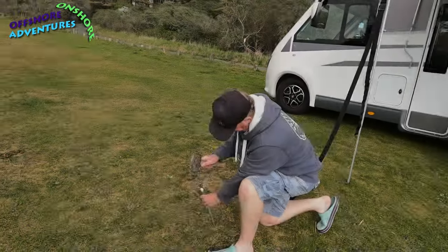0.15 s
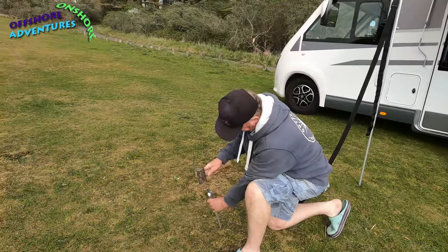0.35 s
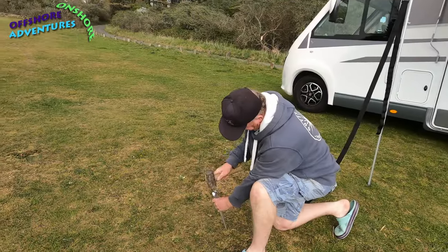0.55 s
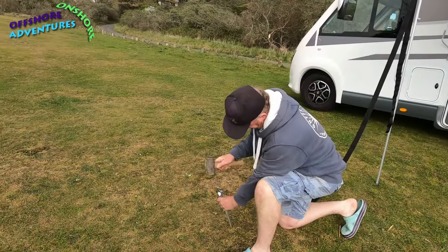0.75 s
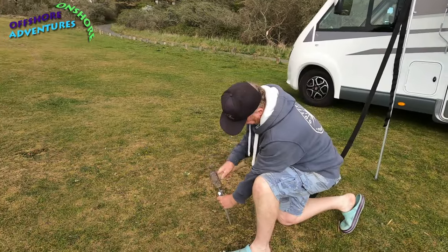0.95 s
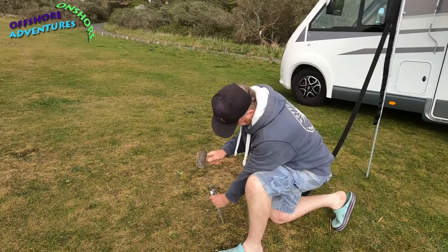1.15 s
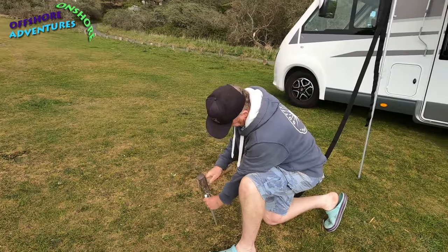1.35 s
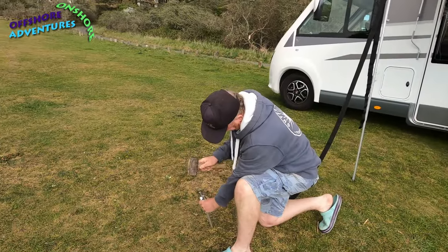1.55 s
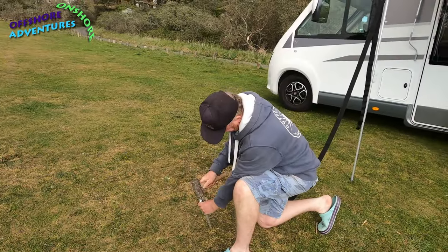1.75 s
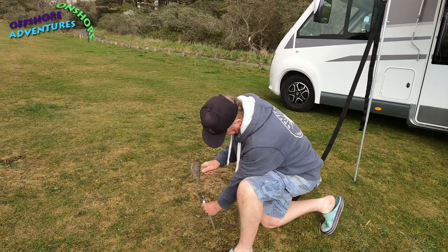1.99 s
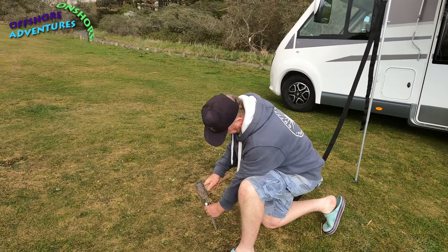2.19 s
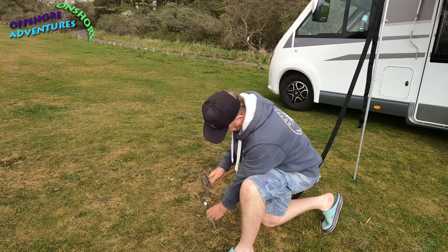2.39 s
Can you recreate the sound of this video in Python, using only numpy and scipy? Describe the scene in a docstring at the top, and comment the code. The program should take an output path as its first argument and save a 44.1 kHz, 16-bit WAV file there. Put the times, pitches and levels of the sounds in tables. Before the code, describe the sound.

Seven bright hammer blows land on a metal peg at a steady pace, a few metres off on an open lawn. Each rings faintly and echoes briefly, and the later ones thud more as a faint low rumble eases.

```python
"""A club hammer drives a steel tent peg into a lawn, a few metres off: seven blows, about 0.4 s apart.
Each blow chatters on the peg, rebounds within 5 ms and thuds the turf. A parked camper van, then a
hedge, throw the clank back; the steel rings on faintly. Grit crunches at the peg after some blows.
The thud grows as the peg goes deeper, while a low outdoor rumble eases off under a faint hiss."""
import sys
import numpy as np
from scipy import signal
from scipy.fft import rfft, irfft
from scipy.io import wavfile
from scipy.ndimage import uniform_filter1d

SR = 44100
rng = np.random.default_rng(int(sys.argv[2]) if len(sys.argv) > 2 else 0)


def master_out(mix):
    """Clip the mix to full scale and print it as 16-bit PCM to the path in sys.argv[1]."""
    frames = np.transpose(np.atleast_2d(mix))
    ceiling = np.clip(frames, -1, 1)
    pcm = np.round(ceiling * 32767).astype(np.int16)
    wavfile.write(sys.argv[1], SR, pcm)


N = 106986

# Hammer blows. Each row: start in seconds, clank gain in dB, rebound delay in seconds, rebound, body,
# bite and treble gains in dB, main mode in Hz, then main mode, thud, echo and head ring gains in dB.
BLOWS = [(.0062, -2, 0.0039, -2, -0.5, 2.5, -1.5, 3242, -5.5, -19, 0, -29),
         (0.3602, 2, 0.0036, -3.5, -5.5, 2.5, -2.5, 3356, -2.5, -10.5, -3, -28),
         (0.698, 1.5, .0042, -6, -0.5, -2.5, 1, 3186, -3, -3.5, -.5, -7.5),
         (1.0686, -1.5, .0022, -1, -2, 2.5, 0.5, 3348, 4, -1.5, -4.5, -9),
         (1.4634, -.5, 0.0028, -4.5, 2, 0.5, 1.5, 3400, -1.5, 1.5, -3, -3.5),
         (1.8731, -1, .0028, -3, 3, 2, 4.5, 3420, 1.5, 0, -3, -24),
         (2.2976, -1.5, 0.0022, -1, 1.5, 1.5, 0.5, 3040, 1, 3, -1, -0.5)]
# Peg modes, damped by hand and soil. Each row: frequency in Hz, relative level in dB, T60 in seconds.
PEG_MODES = [(1111, -18, 0.0047), (2577, -17, 0.042), (3175, -9, 0.036), (3549, -8, 0.03), (4220, -5, 0.02),
             (5305, -9.5, 0.021), (7125, -9, 0.021), (8536, -17, 0.031), (9565, -22, 0.03),
             (10933, -14.5, 0.024), (13140, -28.5, 0.029)]
# Lasting steel modes. Each row: frequency in Hz, relative level in dB, T60 in seconds.
STEEL_MODES = [(3260, -8, 0.41), (3610, -2.5, .3), (4090, -7, .26), (5320, -7.5, .3), (7240, -13.5, .28),
               (8377, -14, .25), (8560, -13, 0.45)]
# Turf modes. Each row: delay in seconds, frequency in Hz, relative level in dB, T60 in seconds.
TURF_MODES = [(0.003, 47, -39, 0.38), (0.0023, 207, -28, .07), (.0015, 350, -30, 0.043),
              (0.0024, 540, -38.5, 0.048), (.013, 135, -24, 0.023)]
# Grit crunches. Each row: start, rise and decay in seconds, level in dB, band centre in Hz.
CRUNCHES = [(.049, 0.0016, 0.0049, -51.5, 390), (.958, .0015, 0.0056, -44.5, 910),
            (.735, .003, 0.0041, -45.5, 910), (2.332, 0.021, 0.013, -38.5, 640)]
# Noise spectra. Each row: frequency in Hz, relative density in dB.
CHATTER_SPECTRUM = [(200, -15.5), (500, -13.5), (750, -26), (1050, -7.5), (1800, -7), (3200, -1),
                    (4300, -1.5), (5500, -5), (7300, -9), (9500, -12), (12000, -22.5), (14000, -26),
                    (16000, -51)]
SOIL_SPECTRUM = [(30, -9), (100, -3.5), (170, 2), (330, -12.5), (600, -22.5), (1500, -35)]
RUMBLE_SPECTRUM = [(12, -33), (25, -18.5), (36, -4), (47, 7), (60, -4), (80, -10.5), (114, -16.5),
                   (150, -12), (216, -11.5), (280, -20), (380, -31), (544, -37.5), (700, -45), (910, -59.5)]
HISS_SPECTRUM = [(300, -6), (700, -3), (1200, 0), (2000, -8), (3500, -10), (7000, -18), (10000, -28),
                 (16000, -44)]
# Reflector responses. Each row: frequency in Hz, gain in dB.
VAN_RESPONSE = [(150, -18.5), (700, -16), (2000, -3.5), (3300, -11), (4200, -12.5), (5400, -13),
                (7000, -17), (10000, -14.5), (15000, -33.5)]
HEDGE_RESPONSE = [(150, -17), (700, -16.5), (1300, -17.5), (2200, -12.5), (3300, -21.5), (4200, -20.5),
                  (5400, -20), (7000, -23), (10000, -20), (12500, -21), (15000, -37.5)]
# Hedge scatter decay. Each row: frequency in Hz, T60 in seconds.
HEDGE_DECAY = [(200, 0.21), (1000, .36), (3000, 0.41), (7000, 0.4), (13000, 0.14)]
# Rumble envelope. Each row: time in seconds, level in dB.
RUMBLE_ENVELOPE = [(0, -49.5), (.85, -52), (1.3, -55), (1.701, -56.5), (2.42, -58)]
# Microphone port phase. Each row: frequency in Hz, lag of the left port in radians.
PORT_LAG = [(20, 1), (400, 0.36), (1400, 0.1), (3300, 0.75), (5200, 1.38), (7000, 1.35), (9000, 1.2),
            (12000, 1.95)]
# Microphone port balance. Each row: frequency in Hz, left minus right in dB.
PORT_BALANCE = [(100, 3), (1200, -2.5), (3300, 2), (5500, -2), (7000, -2.5), (9000, -9), (14000, 1.5)]

STEEL_RISE_S, TURF_RISE_S = 0.00052, 0.0025


def peg_clank(rebound_s, rebound_db, body_db, bite_db, treble_db, main_hz, main_db):
    """The hammer lands, rebounds and lands again; each contact chatters and rings the peg."""
    modes_db, chatter_db, chatter_s, detune = -14, -14.5, 0.003, 0.0061
    t = np.arange(SR // 6) / SR
    out = np.zeros(len(t))
    chatter_envelope = np.minimum(t / STEEL_RISE_S, 1) * np.exp(-(t / chatter_s) ** 2)
    for start_s, contact_db in [(0, 0), (rebound_s, rebound_db)]:
        modes = np.zeros(len(t))
        for hz, db, t60_s in PEG_MODES:
            detuned_hz = hz * (1 + detune * rng.standard_normal())
            modes += ring(t, detuned_hz, db, t60_s) * rng.choice([-1, 1])
        chatter = noise(CHATTER_SPECTRUM, len(t)) * chatter_envelope
        add(out, start_s, amp(contact_db) * (amp(modes_db) * modes + amp(chatter_db) * chatter))
    out += ring(t, main_hz, main_db - 15.5, t60_s=0.038)
    return colour(out, [(1700, body_db), (3200, 0), (4200, bite_db), (5500, treble_db)])


def steel_ring(head_db):
    """Thin, wavering after-ring of the peg, plus one high mode of the hammer head."""
    modes_db, detune, waver_depth, waver_s = -50.5, 0.0021, 0.99, 0.02
    t = np.arange(SR // 2) / SR
    modes = [ring(t, hz * (1 + detune * rng.standard_normal()), modes_db + db, t60_s)
             for hz, db, t60_s in STEEL_MODES]
    waver = unit(uniform_filter1d(rng.standard_normal((len(modes), len(t))), round(waver_s * SR)))
    head = ring(t, hz=12110, db=head_db - 57.5, t60_s=0.55)
    return (modes * (1 + waver_depth * waver)).sum(0) + head


def turf_thud():
    """The peg shoves the turf, which bounces and settles."""
    soil_db, soil_decay_s = -35, 0.036
    t = np.arange(SR // 3) / SR
    modes = sum(ring(t - delay_s, hz, db, t60_s, TURF_RISE_S) for delay_s, hz, db, t60_s in TURF_MODES)
    soil_envelope = np.minimum(t / TURF_RISE_S, 1) * np.exp(-t / soil_decay_s)
    return modes + amp(soil_db) * noise(SOIL_SPECTRUM, len(t)) * soil_envelope


def grit_crunch(grain_db=6.5):
    """Grit and grass rub where the peg shifts: bursts of grainy band noise."""
    t, out = np.arange(N) / SR, np.zeros(N)
    for start_s, rise_s, decay_s, db, centre_hz in CRUNCHES:
        white = rng.standard_normal(N)
        grains = white * amp(grain_db * unit(uniform_filter1d(rng.standard_normal(N), size=60)))
        offset_octaves = np.log2((np.fft.rfftfreq(N, 1 / SR) + 1) / centre_hz)
        friction = unit(irfft(rfft(grains) * np.exp(-offset_octaves ** 2 / 2), N))
        attack = np.clip((t - start_s) / rise_s, 0, 1)
        decay = np.exp(-np.maximum(t - start_s - rise_s, 0) / decay_s)
        out += amp(db) * attack * decay * friction
    return out


def grass_scatter(x, gain_db=-13.5, peak_s=0.0016):
    """Quick reflections off the lawn, different in each channel."""
    t = np.arange(SR // 40) / SR
    taps = rng.standard_normal((2, len(t))) * t * np.exp(-2 * t / peak_s)
    return amp(gain_db) * signal.fftconvolve(x[None], taps / np.linalg.norm(taps[0]), axes=1)[:, :N]


def van_echo(x, spread_s=0.0097):
    """Short cluster of reflections off the side of the van."""
    t = np.arange(SR // 20) / SR
    taps = rng.standard_normal(len(t)) * np.exp(-(t / spread_s) ** 2)
    return colour(signal.fftconvolve(x, taps / np.linalg.norm(taps)), VAN_RESPONSE)


def hedge_echo(x):
    """Diffuse scatter off the bushes; it thins beyond the hedge, and the top treble dies first."""
    hedge_end_s, drop_db, left_bias_db = 0.105, -5, 1
    white = pair(*rng.standard_normal((2, SR * 2 // 3)), correlation=0.26)
    hz, t, spectrum = signal.stft(white, SR, nperseg=256)
    decay_db = drop_db * (t > hedge_end_s) - 60 * t / read(HEDGE_DECAY, hz)[:, None]
    tail = signal.istft(spectrum * amp(decay_db), SR, nperseg=256)[1]
    echo = signal.fftconvolve(x[None], tail / np.linalg.norm(tail[0]), axes=1)
    return colour(echo, HEDGE_RESPONSE) * amp([[left_bias_db / 2], [-left_bias_db / 2]])


def outdoor_air(hiss_db=-73):
    """Low rumble that eases off, and a faint far hiss."""
    rumble_db = np.interp(np.arange(N) / SR, *np.transpose(RUMBLE_ENVELOPE))
    rumble = pair(noise(RUMBLE_SPECTRUM), noise(RUMBLE_SPECTRUM), correlation=0.84)
    hiss = pair(noise(HISS_SPECTRUM), noise(HISS_SPECTRUM), correlation=0.43)
    return amp(rumble_db) * rumble + amp(hiss_db) * hiss


def microphone_ports(x):
    """Near sound reaches the right port first; the balance varies with frequency."""
    hz = np.fft.rfftfreq(2 * N, 1 / SR)
    spectrum, balance = rfft(x, 2 * N), amp(read(PORT_BALANCE, hz) / 2)
    left = spectrum * balance * np.exp(-1j * read(PORT_LAG, hz))
    return irfft(np.array([left, spectrum / balance]))[:, :N]


def ring(t, hz, db, t60_s, rise_s=STEEL_RISE_S):
    """One decaying mode, silent before t = 0."""
    t = np.maximum(t, 0)
    return amp(db - 60 * t / t60_s) * np.minimum(t / rise_s, 1) * np.sin(2 * np.pi * hz * t)


def noise(points, size=N):
    """Noise of rms 1 with a (Hz, dB) spectrum."""
    gain = amp(read(points, np.fft.rfftfreq(size, 1 / SR)))
    return unit(irfft(rfft(rng.standard_normal(size)) * gain, size))


def colour(x, points, size=2048):
    """Causal filter with a (Hz, dB) response."""
    log_gain = np.log(amp(read(points, abs(np.fft.fftfreq(size, 1 / SR)))))
    taps = np.fft.ifft(np.exp(signal.hilbert(log_gain).conj())).real[:size // 2]
    return signal.fftconvolve(x, np.array(taps, ndmin=x.ndim), axes=-1)[..., :x.shape[-1]]


def pair(a, b, correlation):
    """Stereo from two independent signals."""
    return np.array([a, correlation * a + np.sqrt(1 - correlation ** 2) * b])


def read(points, hz):
    """Table lookup on a log-frequency axis."""
    points_hz, values = np.transpose(points)
    return np.interp(np.log(hz + 1), np.log(points_hz + 1), values)


def add(mix, start_s, sound):
    """Mixes a sound in place."""
    part = mix[..., round(start_s * SR):][..., :sound.shape[-1]]
    part += sound[..., :part.shape[-1]]


def amp(db):
    """Decibels to gain."""
    return 10 ** (np.asarray(db) / 20)


def unit(x):
    """Scales to rms 1."""
    return x / np.sqrt(np.mean(x ** 2) + 1e-20)


def scene():
    """Blows and echoes over grit and open air, in stereo."""
    van_delay_s, hedge_delay_s = 0.018, 0.022
    near, far = grit_crunch(), outdoor_air()
    for start_s, clank_db, *clank_shape, thud_db, echo_db, head_db in BLOWS:
        clank = amp(clank_db) * peg_clank(*clank_shape)
        add(near, start_s, clank)
        add(near, start_s, steel_ring(head_db))
        add(near, start_s, amp(thud_db) * turf_thud())
        add(near, start_s + van_delay_s, amp(echo_db) * van_echo(clank))
        add(far, start_s + hedge_delay_s, amp(echo_db) * hedge_echo(clank))
    return microphone_ports(near) + grass_scatter(near) + far


def record(dry, ceiling=0.9, cutoff_hz=16400):
    """Soft peak limiter, then low-pass."""
    rounded = dry / (1 + (dry / ceiling) ** 4) ** 0.25
    lowpass = signal.firwin(511, cutoff_hz, window=("kaiser", 9), fs=SR)
    return signal.oaconvolve(rounded, lowpass[None], "same")


dry = scene()
out = record(dry)
master_out(out)
```